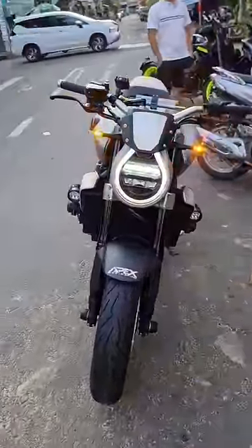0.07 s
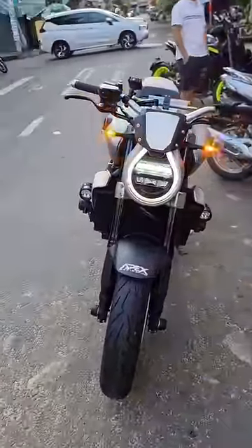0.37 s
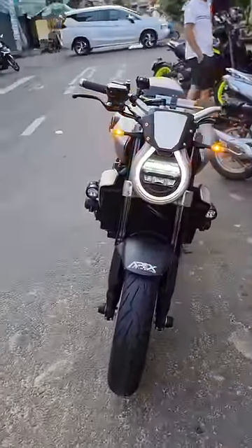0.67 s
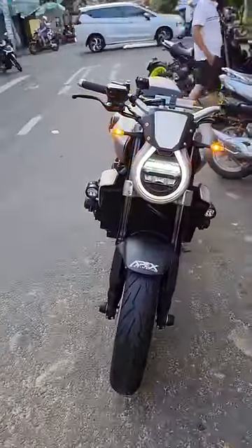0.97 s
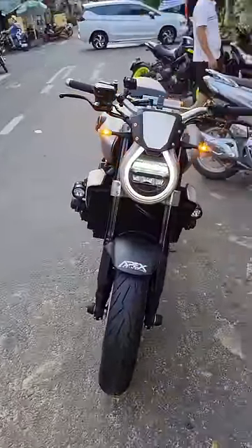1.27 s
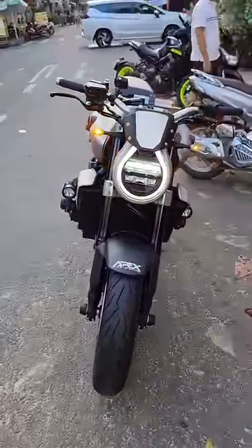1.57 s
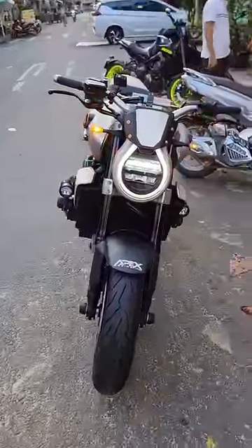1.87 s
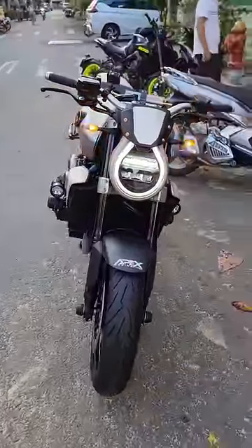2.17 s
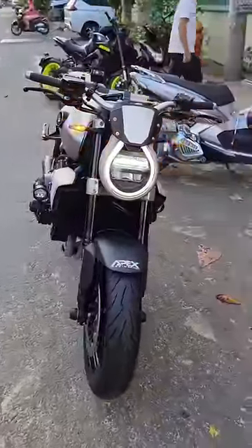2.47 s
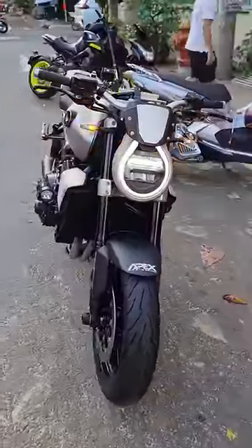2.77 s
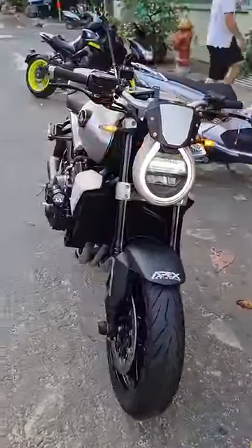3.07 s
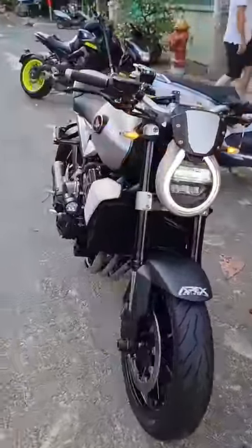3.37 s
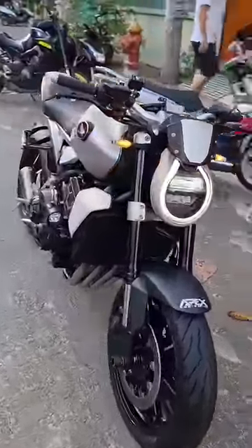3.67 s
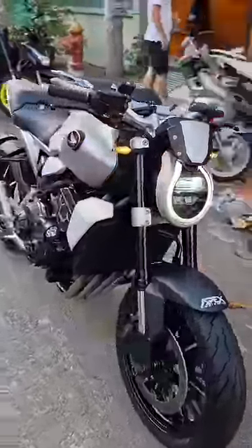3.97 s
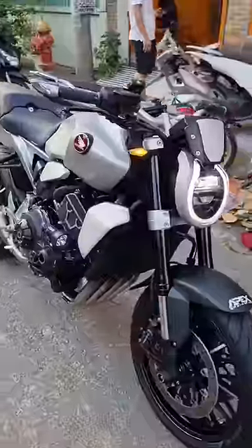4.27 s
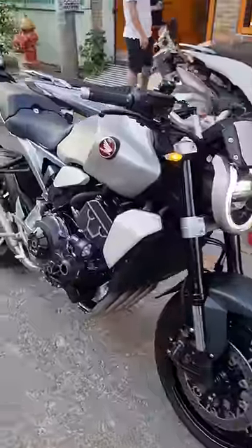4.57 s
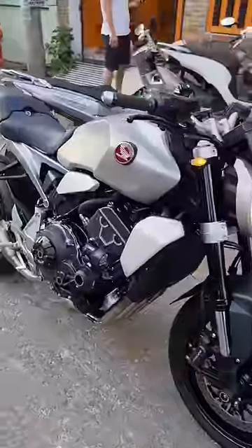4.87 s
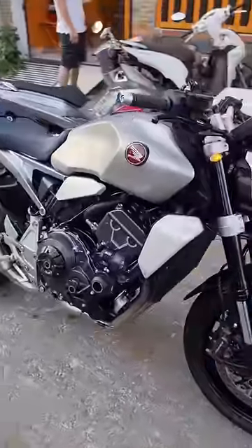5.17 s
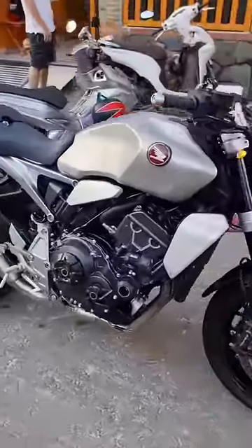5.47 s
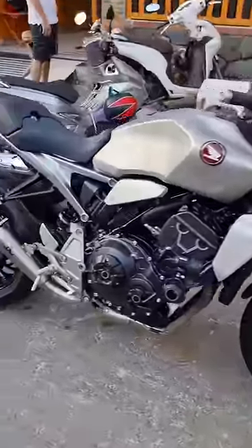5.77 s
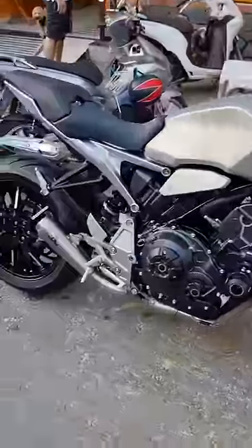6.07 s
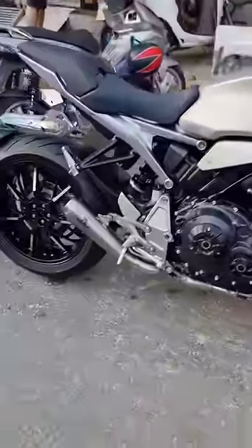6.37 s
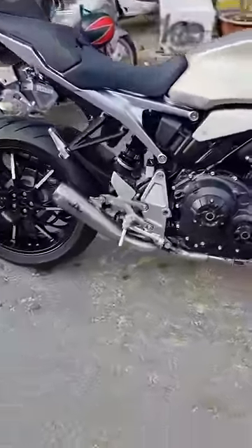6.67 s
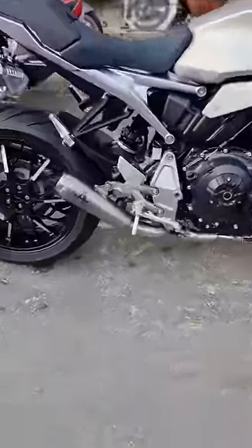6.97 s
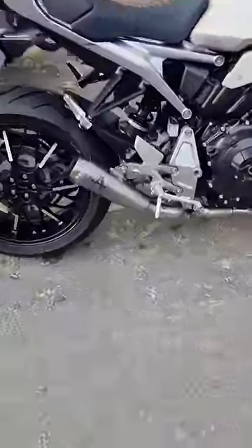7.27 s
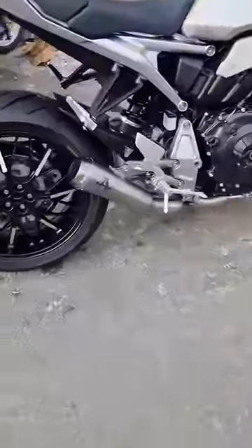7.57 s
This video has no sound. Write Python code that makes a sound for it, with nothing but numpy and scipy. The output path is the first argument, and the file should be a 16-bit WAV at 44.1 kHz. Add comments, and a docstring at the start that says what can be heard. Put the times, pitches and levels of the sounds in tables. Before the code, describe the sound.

A four-cylinder motorcycle idles in a street for the whole eight seconds, with a fast, lumpy, bass-heavy throb of about eight beats a second. Each firing adds a raspy metallic bark and a light puff of hiss; harder, rattly knocks stick out irregularly and the rhythm stumbles now and then. In the first half second there is a faint scuff with a small squeak, probably a shoe. The microphone starts in front of the bike, where the hiss is soft and blurred by echoes. From about 3 to 5 seconds it passes beside the engine, and the sound grows a little fuller, with clearer bark and hiss. From about 5.5 seconds it nears the tailpipe, and the pulses become dry pops with short spits of gas, clearest around 7.5 seconds. The idle slows very slightly overall. Distant traffic rumbles faintly and evenly underneath.

```python
"""Walking along an idling motorcycle

A four-cylinder motorcycle holds a fast, lumpy idle in a street while the microphone walks from its
nose to its tailpipe. Two cylinders fire strongly and weakly by turns, so the exhaust throbs once in
eight firings; now and then one stumbles. Every firing booms through the pipe, barks at the outlet
and lets out a puff of hiss. Far traffic rumbles, and at the start there is a brief scuff, probably
a shoe, with a faint squeak."""
import sys
import numpy as np
from scipy import signal
from scipy.fft import rfft, irfft, next_fast_len
from scipy.io import wavfile
from scipy.ndimage import map_coordinates

SR = 44100
rng = np.random.default_rng(int(sys.argv[2]) if len(sys.argv) > 2 else 0)


def wrap_up_sound(samples):
    """Save the sound to the file named by the first command line argument, as 16-bit audio."""
    columns = np.atleast_2d(samples).T
    # keep every value between -1 and 1, then stretch to whole-number steps
    tamed = np.clip(columns, -1, 1)
    steps = np.round(tamed * 32767).astype(np.int16)
    wavfile.write(sys.argv[1], SR, steps)


N = 344862
TIME = np.arange(N) / SR
FFT_SIZE = next_fast_len(N + SR // 2, True)
HZ = np.fft.rfftfreq(FFT_SIZE, 1 / SR) + 1 / SR

# The second at which the microphone reaches each of nine places: nose, headlamp, front wheel, fork,
# radiator, clutch cover, footrest, swingarm, tailpipe.
PLACE_TIMES = [.6, 1.8, 2.8, 3.4, 3.9, 4.9, 5.8, 6.5, 7.4]
# For each place, the share of a puff that arrives directly; the street's echoes smear the rest.
DIRECT_SHARE = [.25, .35, .45, .55, .7, .8, .85, .9, .95]
# For each place, the level of the bark in dB.
BARK_DB = [-35, -36.5, -32.5, -30, -29, -26.5, -40, -32.5, -29]
# Firings that knock harder than the rest. Each row: time in seconds, relative level in dB.
KNOCKS = [(0.028, -23.5), (0.088, -21.5), (0.148, -20.5), (0.419, -27), (0.688, -23), (0.869, -19),
          (0.96, -24), (1.11, -21.5), (1.205, -25.5), (1.326, -25), (1.447, -27), (1.476, -26.5),
          (1.569, -24), (1.599, -24.5), (1.691, -26.5), (1.737, -24), (1.841, -21.5), (1.931, -24.5),
          (2.053, -23.5), (2.208, -22.5), (2.301, -23.5), (2.425, -25), (2.454, -18), (2.546, -24),
          (2.702, -16), (2.795, -25), (2.918, -22), (3.04, -21.5), (3.349, -24.5), (3.442, -24),
          (3.548, -21), (3.749, -19.5), (3.841, -13.5), (4.057, -17.5), (4.087, -18), (4.181, -23.5),
          (4.21, -18), (4.302, -22.5), (4.42, -16), (4.45, -18), (4.544, -22), (4.653, -21), (4.669, -17.5),
          (4.92, -22), (5.028, -22), (5.047, -18.5), (5.074, -19), (5.171, -21), (5.328, -16.5),
          (5.553, -22), (5.836, -27.5), (6.207, -22.5), (6.332, -22.5), (6.572, -18.5), (6.699, -19),
          (6.796, -21), (7.019, -23), (7.085, -16.5), (7.183, -15), (7.282, -22), (7.524, -20.5),
          (7.648, -18.5), (7.696, -20), (7.76, -19), (7.775, -23)]
# Tone of the gas hiss and the scuff. Each row: frequency in Hz, relative level in dB.
HISS_TONE = [(1530, -56), (2600, -1), (3710, -7.5), (4150, -3), (4980, -5.5), (7710, -2.5), (9670, -2.5),
             (11200, -1.5), (14500, 4.5), (15100, 3), (15800, -2.5)]


def firings():
    """Times and strengths of the firings; weak burns come late and vary the most."""
    # Engine speed. Each row: time in seconds, firings per second.
    speed = [(0.0, 67.52), (0.75, 66.29), (0.85, 65.47), (2.01, 66.36), (2.03, 64.74), (3.53, 64.89),
             (3.84, 65.16), (4.18, 64.35), (4.33, 67.86), (4.62, 63.14), (5.03, 64.35), (5.48, 62.06),
             (6.01, 65.62), (6.37, 62.82), (6.88, 62.54), (7.29, 60.3), (7.62, 64.56), (7.82, 62.02)]
    # The cylinders in firing order. Each row: strength on the strong cycle, strength on the weak one.
    cylinders = [(1.1, 0.36), (0.88, 0.82), (1.03, 0.34), (0.84, 0.79)]
    # For each cylinder, 1 if it begins on its weak cycle.
    weak_first = [1, 0, 0, 1]
    # A stumble swaps a cylinder's strong and weak cycles. Each row: time in seconds, cylinder 0-3.
    stumbles = [(.24, 2), (.4, 0), (.75, 2), (3.08, 0), (6.69, 0), (7.25, 2)]
    drift_s, late_s, jitter_s = .00035, .0012, .00015
    fired = np.cumsum(np.interp(TIME, *np.transpose(speed))) / SR
    number = np.arange(int(fired[-1]))
    times = np.interp(number + .1, fired, TIME)
    cycle, cylinder = np.divmod(number, len(cylinders))
    swaps = sum((times > when) & (cylinder == which) for when, which in stumbles)
    weak = (cycle + swaps + np.array(weak_first)[cylinder]) % 2
    usual = np.array(cylinders)[cylinder, weak]
    strength_luck, timing_luck = rng.standard_normal((len(times), 2)).T
    least = np.full(len(times), .1)
    least[[np.argmin(abs(times - when)) for when, _ in KNOCKS]] = .92  # a knock is never weak
    strength = np.maximum(usual + .045 * strength_luck / usual, least)
    drift = drift_s * np.interp(times, TIME, wobble(per_second=7))  # the idle wanders
    return times + drift + late_s * (1 - strength) + jitter_s * timing_luck, strength


def boom(times, strength, nearby, beside):
    """Pressure pulses ring the pipe, whose bass lags and trails behind each one."""
    # The pipe's resonances. Each row: pitch in Hz, width in Hz, then level in dB at each place.
    pipe = [(43.8, 8.6, 39, 37.5, 42, 45, 43, 43.3, 40.6, 45, 43.3),
            (59.3, 15, 37.5, 39.1, 40.6, 41, 40.8, 38.1, 36.8, 36, 36.6),
            (94.4, 14.5, 29, 29, 40, 37, 41, 41.7, 41.4, 39, 42.3),
            (134.2, 17, 26, 27, 29, 28, 28, 22, 18, 27, 24),
            (173, 18, 33, 31.6, 40, 34, 32, 20, 35, 13, 33),
            (192.3, 24, 41.8, 39.5, 33, 21, 36.2, 39.5, 37, 37.8, 35),
            (214.4, 28, 42.7, 43.7, 45, 47.7, 46.4, 43.4, 41, 39.6, 42.2),
            (284.5, 28.4, 39.5, 40.2, 38, 35, 14, 11, 21, 33, 40),
            (322.4, 36, 32.7, 32.7, 38.6, 33, 30.7, 31.2, 33.5, 36.2, 38.1),
            (372, 107, 19, 5.3, 8, 13, 29.7, 25, 31.8, 30, 32),
            (447.3, 57, 24.6, 21.4, 27.7, 29, 13, 29.7, 32.3, 27.5, 29.8),
            (510.4, 26.4, 28, 35.4, 18, 16, 29.4, 33.6, 32.5, 31, 24.5),
            (619, 143, 11, 6.3, 7.4, 16, 24.3, 23, 24.3, 12, 4)]
    travel_s, smear_hz = .0004, 300
    front_throb = .74  # share of the strong-weak contrast left in front of the bike
    throb = front_throb + (1 - front_throb) * np.interp(times, TIME, beside)
    blows = pulses(times + travel_s, 1 + throb * (strength - 1))
    bass_lag = (smear_hz - 1j * HZ) / (smear_hz + 1j * HZ)
    return -ring(filtered(blows, bass_lag), pipe, nearby)


def eddies(times, strength, nearby):
    """Swirling gas behind each pulse roughens the boom."""
    # Tone of the swirl. Each row: frequency in Hz, relative level in dB.
    tone = [(120, -35), (230, 0), (370, 6.5), (540, -4.5), (700, -6), (1200, -52.5)]
    # For each place, the level of the swirl in dB.
    level_db = [-25.5, -24, -23, -23.5, -23, -22.5, -20.5, -21.5, -24]
    flow = puffs(times, strength ** .67, rise_s=.0045, ebb_s=.0029)
    swirl = filtered(flow * rng.standard_normal(N), ringing_filter(tone_gain(tone)))
    return amp(level_db @ nearby) * unit(swirl)


def bark(times, strength, nearby, beside):
    """Strong pulses steepen into a crack with a rasping tail, which rings the metal; knocks rattle."""
    # Resonances of the outlet and engine covers.
    # Each row: pitch in Hz, width in Hz, then relative level in dB at each place.
    metal = [(680, 102, 9.5, 10, 8.5, 14.5, 4.5, 2.5, -25, -15, 2),
             (801, 128, 5.5, 4.5, -2.5, 5.5, 2, 1, 2, 4, 0),
             (1005, 105, 5.5, 7, 3.5, 6, -6, -6.5, 4.5, -4, -6),
             (1152, 88, -4.5, -6, -22, -26, -7, -4.5, 2, -3, -2.5),
             (1348, 164, -5, -3.5, -5, -4, 1, -3.5, -4.5, -4.5, -18),
             (1603, 73, -3.5, -6.5, -3, -2, -5, -12, 3.5, -4, -17),
             (1842, 120, -13, -30, -33, -27, -18, -3.5, -3, -17, -8),
             (1990, 790, -23, -25.5, -18.5, -16, -15, -16.5, -12, -13.5, -18)]
    # The bright rattle of the hardest knocks. Each row: frequency in Hz, relative level in dB.
    rattle_tone = [(900, -16), (1500, -1), (2200, 0.5), (3200, -10.5), (7000, -28), (12000, -37)]
    ceiling = 1.7  # ordinary barks level off near this size
    sizes = ceiling * np.tanh(strength ** 3.4 / ceiling) * uneven(times, spread_db=1)
    starts = times - .00106  # just ahead of the boom
    for when, db in KNOCKS:
        nearest = np.argmin(abs(times - when))
        starts[nearest] = when
        sizes[nearest] = amp(db - 5.5 - np.interp(when, PLACE_TIMES, BARK_DB))
    front_tail = amp(6.5) * puffs(starts, sizes, rise_s=.00098, ebb_s=.0097)
    side_tail = amp(6) * puffs(starts, sizes, rise_s=.00098, ebb_s=.004)
    rasp = noise(alike=.64) * ((1 - beside) * front_tail + beside * side_tail)
    bursts = noise(alike=.47) * puffs(starts, sizes ** 2, rise_s=.001, ebb_s=.0052)
    rattle = amp(-22) * unit(filtered(bursts, tone_gain(rattle_tone)))
    crack = (DIRECT_SHARE @ nearby) * unit(pulses(starts, sizes))
    return amp(BARK_DB @ nearby) * (unit(ring(crack + rasp, metal, nearby)) + rattle)


def hiss(times, strength, nearby, beside):
    """The gas jet hisses in puffs just ahead of each boom; away from the outlet, echoes blur them."""
    # Centres in Hz of the bands in which the hiss flares, each a little differently.
    bands_hz = [2540, 5000, 8300, 13900]
    # For each place, the level of the hiss in dB.
    level_db = [-44, -46.5, -42.5, -40, -36.5, -37, -37.5, -39, -38]
    starts = times - .0031
    steady = .17 + .056 * (1 - beside)  # share of the hiss that does not pulse
    direct = DIRECT_SHARE @ nearby
    jet = 0
    for band in np.eye(len(bands_hz)):
        band_gain = tone_gain(HISS_TONE) * np.sqrt(np.interp(HZ, bands_hz, band))
        sizes = np.tanh(strength ** 2.1) * uneven(times, spread_db=2.2)
        crisp = puffs(starts, sizes, rise_s=.0033, ebb_s=.0042)
        echoed = puffs(starts, sizes, rise_s=.0033, ebb_s=.028)
        power = direct * crisp ** 2 + (1 - direct) * echoed ** 2
        jet = jet + filtered(noise(alike=.0077), band_gain) * np.sqrt(steady + (1 - steady) * power)
    lean_right = amp([[-.5], [.5]])
    return amp(level_db @ nearby) * unit(jet) * lean_right


def outlet(times, strength, nearby):
    """In line with the outlet each strong pulse arrives as a dry pop with a short spit of gas."""
    # Tones of the pop and the spit. Each row: frequency in Hz, relative level in dB.
    pop_tone = [(200, -39), (450, 4.5), (750, 4), (1200, -2), (2000, -13.5), (3200, -40), (6000, -43)]
    spit_tone = [(3500, -23), (6000, -2), (7700, 5), (10000, -6), (14500, -8), (16000, -10)]
    # For each place, the dB added to both.
    boost_db = [-25, -22, -37, -29, -18, -19, -5, -2.5, 1]
    sizes = np.tanh(strength ** 3.4)
    pop = -unit(filtered(pulses(times + .00166, sizes), ringing_filter(tone_gain(pop_tone))))
    spurts = puffs(times + .0015, sizes * uneven(times, spread_db=2.5), rise_s=.00085, ebb_s=.0042)
    spit = unit(spurts * filtered(noise(alike=.084), tone_gain(spit_tone)))
    return amp(boost_db @ nearby) * (amp(-39) * pop + amp(-47.5) * spit)


def stereo_pickup(exhaust, beside):
    """The exhaust sounds at different levels left and right, and slightly out of step."""
    # The exhaust heard from in front and from beside the bike.
    # Each row: frequency in Hz, left minus right in dB, how far the left leads in radians.
    from_front = [(50, -1.2, -0.2), (200, -3, -0.29), (344, -9, 1), (396, -3, 1), (517, -6.5, 2),
                  (668, -2.5, 4), (773, 9, 4), (975, 2.5, 5.5), (1600, -3, 7.5)]
    from_side = [(50, -1.3, .08), (200, -3.5, 0.1), (310, -3.5, 1), (420, -2.5, 0.73), (534, -7, 1.03),
                 (699, -1, 2.95), (845, 6.5, 5.2), (1320, -11, 5.2), (1970, -1.5, 8.46)]
    left_right = np.array([[.5], [-.5]])
    heard = 0
    for table, share in ((from_front, 1 - beside), (from_side, beside)):
        gain = amp(left_right * frequency_curve(table))
        gain /= np.sqrt(np.mean(gain ** 2, axis=0))
        phase = left_right * frequency_curve(table, column=2)
        heard = heard + share * filtered(exhaust, gain * np.exp(1j * phase))
    return heard


def squeaky_scuff():
    """A brief scuff, probably a shoe, with a faint squeak on a few unsteady tones."""
    # The squeak's tones. Each row: pitch in Hz, relative level in dB.
    tones = [(3472, -57), (3984, -55), (4969, -62), (6471, -68)]
    middle_s, scuff_s, squeak_s = .2, .29, .24  # the loudest moment, then half of each sound's length
    scuff_swell, squeak_swell = [np.exp(-((TIME - middle_s) / s) ** 2) for s in (scuff_s, squeak_s)]
    narrow_bands = sum(amp(db) * unit(np.exp(-((HZ - hz) / 55) ** 2)) for hz, db in tones)
    squeak = filtered(noise(alike=.36), narrow_bands)
    scuff = amp(-41) * unit(filtered(noise(alike=.081), tone_gain(HISS_TONE)))
    return squeak_swell * squeak + scuff_swell * scuff


def traffic():
    """Even noise of far traffic; its low rumble is the same left and right."""
    # Tone of the traffic. Each row: frequency in Hz, relative level in dB.
    tone = [(20, -13), (60, 9.5), (200, 13), (700, -4.5), (1500, -12.5), (3000, -26.5), (8000, -25),
            (15000, -41)]
    # How alike left and right are. Each row: frequency in Hz, likeness from 0 to 1.
    likeness = [(100, 1), (300, 0.98), (1000, 0.11), (3000, 0.021)]
    alike = frequency_curve(likeness)
    shared = filtered(rng.standard_normal(N), tone_gain(tone) * np.sqrt(alike))
    separate = filtered(rng.standard_normal((2, N)), tone_gain(tone) * np.sqrt(1 - alike))
    return amp(-26.5) * unit(shared + separate)


def ring(x, resonances, nearby):
    """Send x through resonances whose strengths change from place to place."""
    peaks = np.array([1 / (1 + ((HZ ** 2 - hz ** 2) / (HZ * width)) ** 2) ** 2
                      for hz, width, *_ in resonances])
    place_db = np.array(resonances).T[2:]
    gains = np.sqrt(amp(place_db) ** 2 @ peaks)
    return sum(share * filtered(x, ringing_filter(gain)) for share, gain in zip(nearby, gains))


def pulses(times, sizes):
    """One click for each firing."""
    samples = np.clip(np.round(times * SR).astype(int), 0, N)
    return np.bincount(samples, sizes, N + 1)[:N]


def puffs(times, sizes, rise_s, ebb_s):
    """A loudness curve: the gas flow jumps at each firing and dies away."""
    t = TIME[:SR // 10]
    one_puff = (1 - np.exp(-(t / rise_s) ** 2)) * np.exp(-t / ebb_s)
    return unit(signal.oaconvolve(pulses(times, sizes), one_puff)[:N])


def uneven(times, spread_db):
    """A random gain for each firing."""
    return amp(spread_db * rng.standard_normal(len(times)))


def wobble(per_second):
    """A smooth curve through so many random points a second."""
    return map_coordinates(rng.standard_normal(int(N * per_second / SR) + 4), [TIME * per_second])


def noise(alike):
    """Stereo white noise whose sides are unrelated at 0 and the same at 1."""
    return np.sqrt(alike) * rng.standard_normal(N) + np.sqrt(1 - alike) * rng.standard_normal((2, N))


def amp(db):
    """Turn decibels into a gain."""
    return 10 ** (np.asarray(db) / 20)


def unit(x):
    """Scale x to an average (rms) level of 1."""
    return x / np.sqrt(np.mean(x ** 2) + 1e-20)


def frequency_curve(rows, column=1):
    """Join a table's points into a value for every frequency; each row starts with Hz."""
    columns = np.transpose(rows)
    return np.interp(np.log(HZ), np.log(columns[0]), columns[column])


def tone_gain(rows):
    """Turn rows of Hz and dB into a gain for every frequency."""
    return amp(frequency_curve(rows))


def filtered(x, response):
    """Multiply each frequency in x by the filter's response."""
    return irfft(rfft(x, FFT_SIZE) * response, FFT_SIZE)[..., :N]


def ringing_filter(gain):
    """A filter with this gain that rings only after a blow, never before it."""
    cepstrum = irfft(np.log(gain + 1e-4).astype(np.float32), FFT_SIZE)[:FFT_SIZE // 2]
    return np.exp(2 * rfft(cepstrum, FFT_SIZE) - cepstrum[0])


def scene():
    """The exhaust's sounds, all driven by the same firings, over the street."""
    # One curve per place: 1 when the microphone is there, fading to 0 at the places either side.
    nearby = np.array([np.interp(TIME, PLACE_TIMES, row) for row in np.eye(len(PLACE_TIMES))])
    beside = 1 - nearby[:3].sum(axis=0)  # 0 at the three places in front, 1 from the fork on
    times, strength = firings()
    pipe = boom(times, strength, nearby, beside) + eddies(times, strength, nearby)
    exhaust = stereo_pickup(pipe + bark(times, strength, nearby, beside), beside)
    gas = hiss(times, strength, nearby, beside) + outlet(times, strength, nearby)
    return exhaust + gas + traffic() + squeaky_scuff()


def record(dry):
    """Round off the tallest peaks and cut the very highest treble."""
    top_hz = 15850
    rounded = dry / (1 + dry ** 8) ** (1 / 8)
    return filtered(rounded, HZ < top_hz)


dry = scene()
out = record(dry)
wrap_up_sound(out)
```